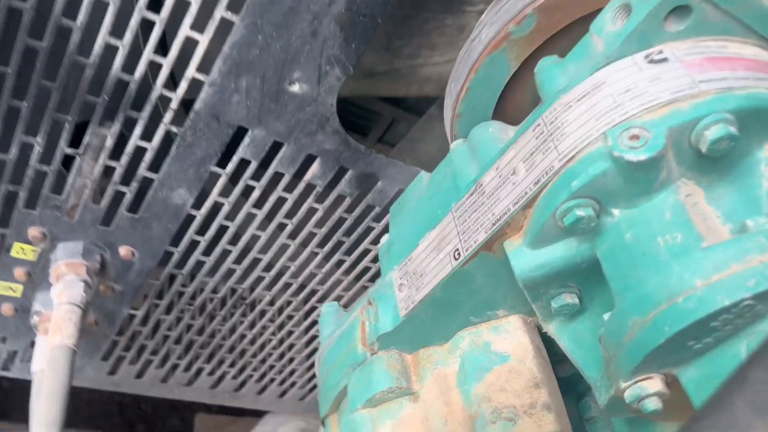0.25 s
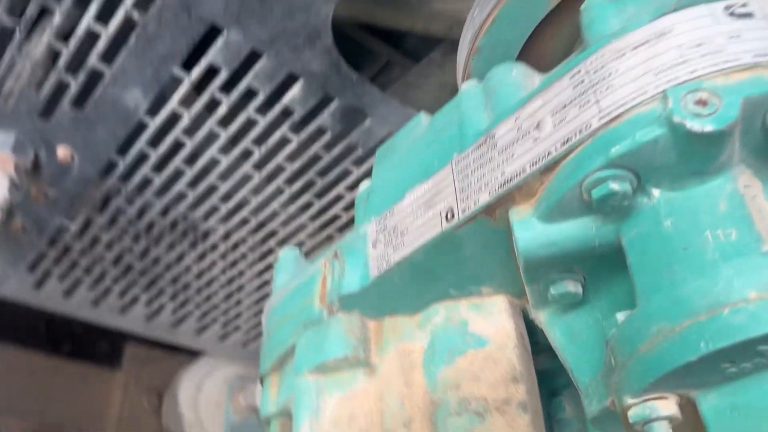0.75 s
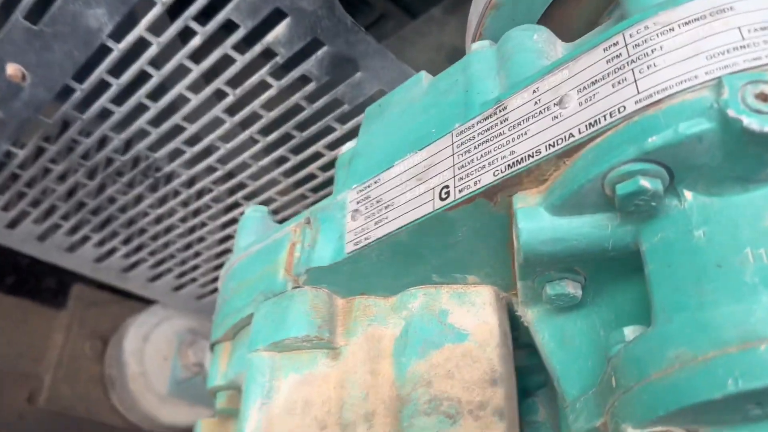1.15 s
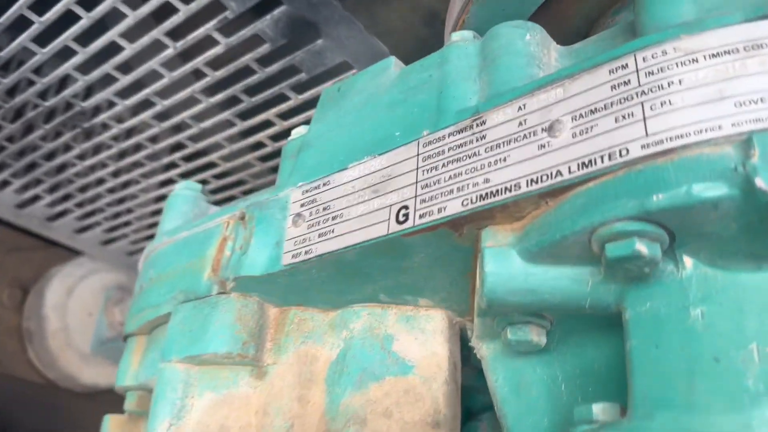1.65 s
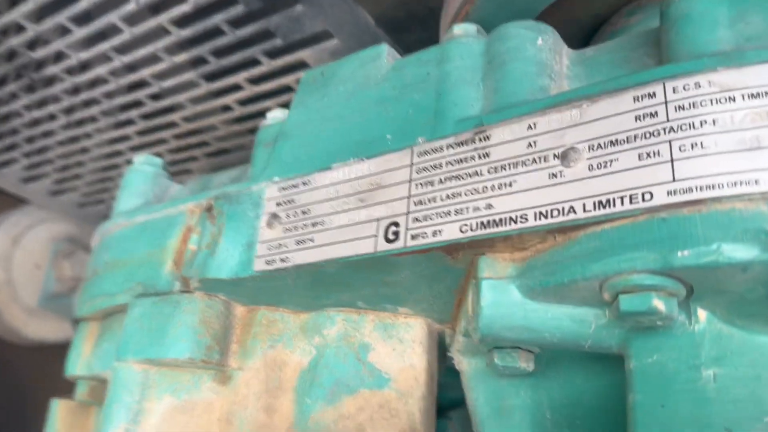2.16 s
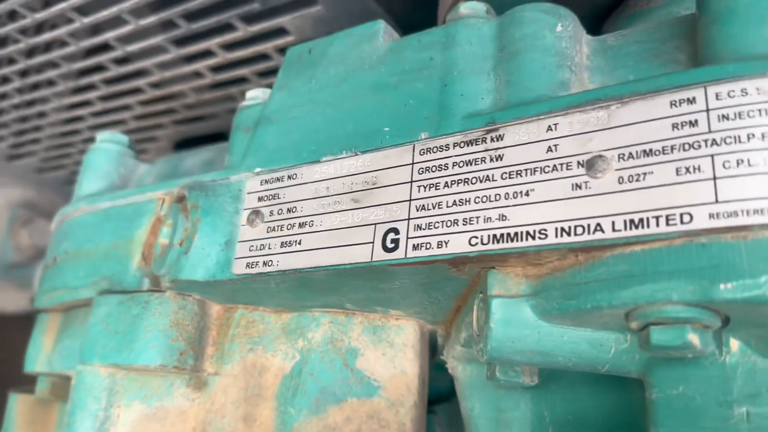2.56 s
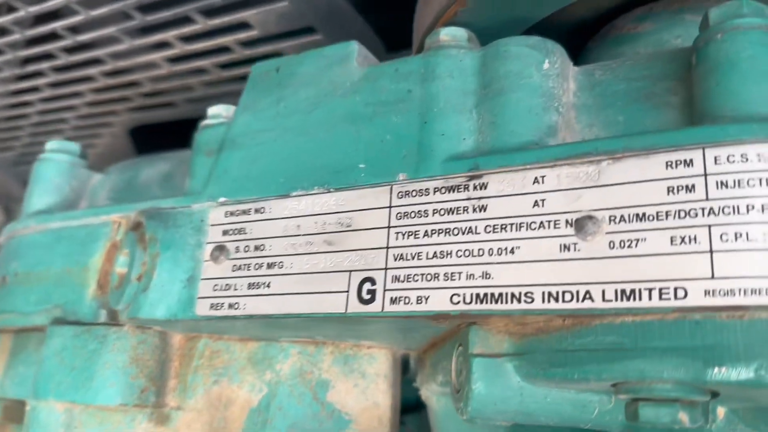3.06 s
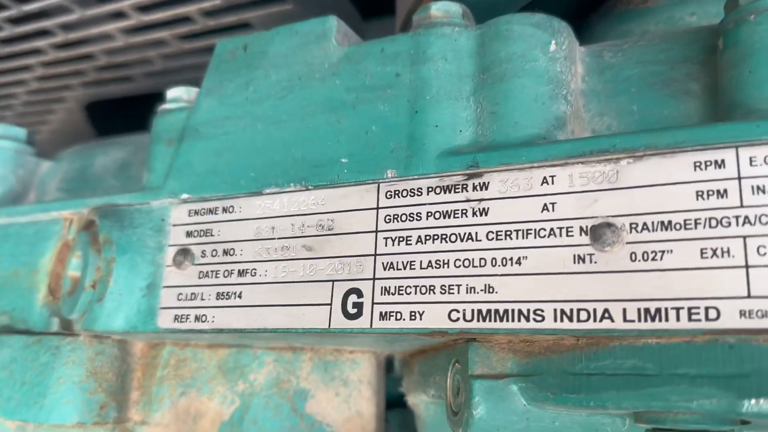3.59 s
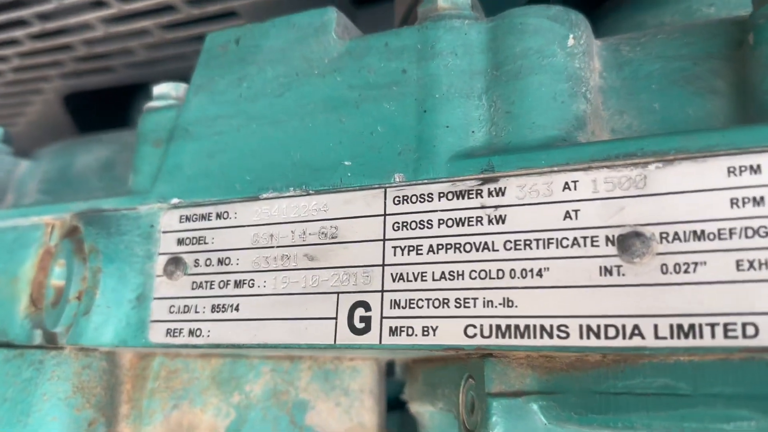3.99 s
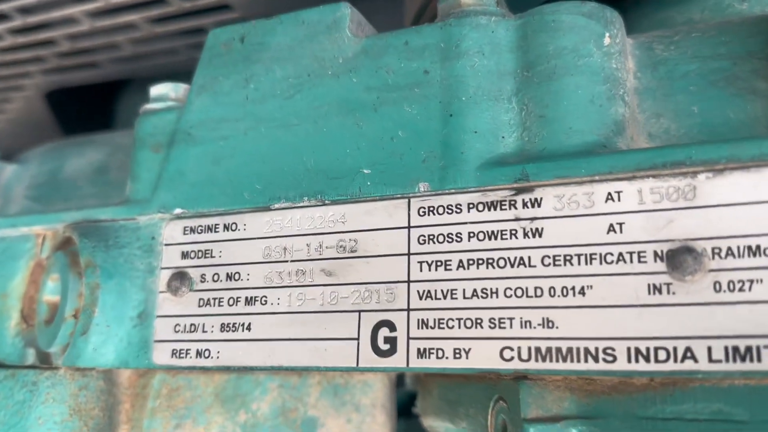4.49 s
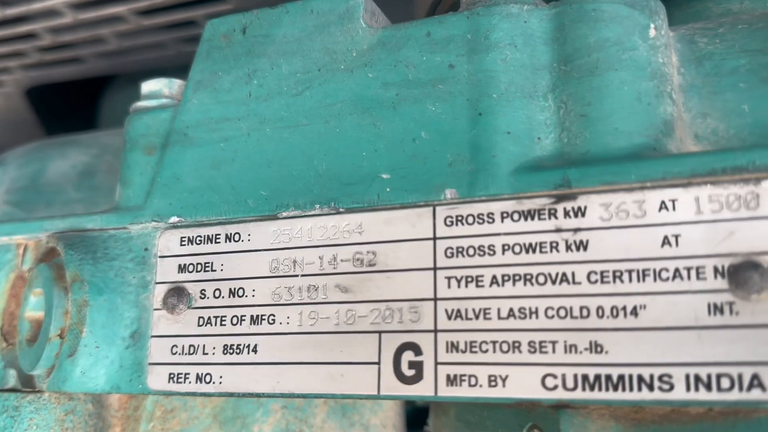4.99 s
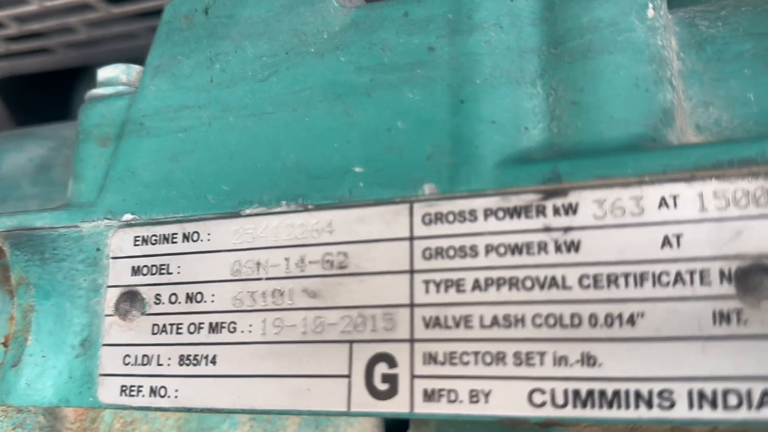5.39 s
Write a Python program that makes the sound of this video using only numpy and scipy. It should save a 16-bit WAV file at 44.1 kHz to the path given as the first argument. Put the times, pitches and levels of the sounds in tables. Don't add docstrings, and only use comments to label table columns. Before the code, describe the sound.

A constant, heavy engine drone fills the whole clip, heard by a handheld stereo microphone moving in towards an engine block. Broad rumble and hiss with open echoes surround it, and thin hums grow slightly with the approach. A faint falling turbine whine opens, quiet chirps and dry handling slips pass in the first half, a tick comes near 3.7 seconds, and a soft ringing whine rises near the end.

```python
import sys
import numpy as np
from scipy import signal
from scipy.fft import rfft, irfft
from scipy.io import wavfile
from scipy.ndimage import uniform_filter1d

SR = 44100
rng = np.random.default_rng(int(sys.argv[2]) if len(sys.argv) > 2 else 0)


def inscribe(sig):
    pcm = np.round(np.clip(np.atleast_2d(sig).T, -1, 1) * 32767)
    wavfile.write(sys.argv[1], SR, pcm.astype(np.int16))


def undo_db(level):
    steps = np.asarray(level, float) / 20
    return 10 ** steps


N = 248724
T = np.arange(N) / SR
CYCLE_HZ = 15.002
SLOW_STEP = 256

# (time [s], distance moved closer [m])
APPROACH = [(0, 0), (.94, -.1), (1.88, .1), (2.82, .15), (3.76, .17), (4.7, 0.33), (5.64, .24)]


def rms_one(x):
    return x / np.sqrt(np.mean(x ** 2) + 1e-20)


def at_hz(points, hz):
    table_hz, value = np.transpose(points)
    return np.interp(np.log(hz), np.log(np.maximum(table_hz, 1)), value)


def distance_closer():
    time_s, closer_m = np.transpose(APPROACH)
    return np.interp(T, time_s, closer_m)


def drift(rate_hz):
    pole = np.exp(-2 * np.pi * rate_hz * SLOW_STEP / SR)
    noise = rng.standard_normal(N // SLOW_STEP + 802)
    slow = signal.lfilter([1], [1, -2 * pole, pole * pole], noise)[800:]
    return rms_one(slow - slow.mean())


def every_sample(slow):
    return np.interp(np.arange(N) / SLOW_STEP, np.arange(len(slow)), slow)


def leaning(x, lean_db):
    return x * undo_db(np.array([[lean_db / 2], [-lean_db / 2]]))


def swells(rows, edge_s=0.089):
    lift_db = np.zeros(N)
    for start, end, db in rows:
        lift_db += db / 2 * (np.tanh((T - start) / edge_s) - np.tanh((T - end) / edge_s))
    return lift_db


def reflections(shape, bins, frames):
    field = rng.standard_normal(shape) + 1j * rng.standard_normal(shape)
    for size, axis in ((bins, -2), (bins, -2), (frames, -1), (frames, -1)):
        field = uniform_filter1d(field, max(int(size), 1), axis=axis)
    return field / np.sqrt(np.mean(np.abs(field) ** 2))


def standing(hz, level_db, db_per_m, echo, crest_m):
    sound_m_per_s = 343
    closer = distance_closer()
    turn = 4 * np.pi * hz * (closer - crest_m) / sound_m_per_s
    echo = np.clip(echo, 0, .9)
    return level_db + db_per_m * closer + 10 * np.log10(1 + echo ** 2 + 2 * echo * np.cos(turn))


def tone(hz, level_db, wander_db, waver, pulse_s):
    apart = every_sample(np.clip(hz / 700, 0, 1) ** 1.5 * drift(.4))
    scatter = rng.random() * (hz > 160)
    phase = 2 * np.pi * (hz * (T - pulse_s) + scatter) + every_sample(waver * drift(0.75))
    height = np.sqrt(2) * undo_db(level_db) * every_sample(undo_db(wander_db * drift(0.34)))
    side = .5 * apart * np.sin(phase) + 0.18 * apart[::-1] * np.cos(phase)
    return height * (np.cos(phase) + side * [[1], [-1]]) / np.sqrt(1 + apart ** 2 / 4)


def noisy_band(hz, level_db, width_hz, lean_db, steady=0):
    hold = 16
    phase = 2 * np.pi * np.cumsum(hz) / SR
    lowpass = signal.butter(2, width_hz / 2, fs=SR / hold, output="sos")
    rough = signal.sosfilt(lowpass, rng.standard_normal((4, N // hold + 2)))
    rough = np.repeat(rms_one(rough), hold, axis=1)[:, :N]
    rough = uniform_filter1d(rough, size=hold)
    wave = (steady + rough[:2]) * np.sin(phase) + rough[2:] * np.cos(phase)
    return leaning(undo_db(level_db) * wave, lean_db)


def birds():
    rough, echo_db, trail_s = 1.1, -1, .04
    trill_hz, trill_depth_hz = 90, 130
    # (start [s], length [s], first frequency [Hz], last frequency [Hz], level [dB])
    chirps = [
        (0.716, 0.053, 4800, 4400, -61.5),
        (0.772, 0.04, 4000, 3120, -56),
        (0.79, 0.061, 3190, 2820, -60),
        (1.096, 0.051, 4340, 3040, -67),
        (1.93, .04, 6200, 5900, -72.5),
        (2.165, 0.09, 6260, 4840, -64.5),
        (4.557, .07, 4670, 3240, -61),
        (4.933, 0.06, 5880, 5030, -70),
    ]
    out = np.zeros(N)
    lowpass = signal.butter(2, 300, fs=SR, output="sos")
    hoarse = 1 + rough * rms_one(signal.sosfilt(lowpass, rng.standard_normal(N)))
    for start, length, first_hz, last_hz, db in chirps:
        u = np.linspace(0, 1, int(length * SR))
        trill = trill_depth_hz * np.sin(2 * np.pi * trill_hz * length * u)
        hz = last_hz + (first_hz - last_hz) * (1 - u) ** 1.7 + trill
        at = int(start * SR)
        out[at:at + len(u)] += undo_db(db) * np.sin(np.pi * u) * np.sin(2 * np.pi * np.cumsum(hz) / SR)
    trail = rng.standard_normal((2, 6000)) * np.exp(-np.arange(6000) / SR / trail_s)
    trail = trail / np.sqrt(np.sum(trail ** 2, axis=1, keepdims=True))
    out = hoarse * out
    return out + undo_db(echo_db) * signal.fftconvolve(out[None], trail, axes=1)[:, :N]


def rustles():
    own = 0.23
    rise_share = 0.34
    # (peak time [s], fall time [s], lowest frequency [Hz], highest frequency [Hz], level [dB])
    slips = [
        (1.73, 0.017, 7000, 10100, -74),
        (1.92, .015, 7000, 9500, -80.5),
        (2.255, 0.02, 5500, 15500, -63.5),
        (2.272, .012, 7700, 8050, -64),
        (2.402, 0.027, 3000, 15940, -53.5),
        (2.45, 0.019, 6000, 10260, -75),
        (3.696, .004, 6000, 7500, -56),
        (1.33, .006, 2600, 4400, -60),
        (3.705, .015, 5800, 7500, -69),
    ]
    # (frequency [Hz], density [dB per Hz])
    friction_colour = [(2000, 4.5), (7000, -0.5), (10000, -7), (10800, -44), (12000, -27.5), (13000, -20),
                       (15500, -15.5), (16200, -48)]
    hz = np.maximum(np.arange(N // 2 + 1) * SR / N, 1)
    noise = rng.standard_normal(N) + own * rng.standard_normal((2, N))
    noise = irfft(rfft(noise) * undo_db(at_hz(friction_colour, hz)), N)
    out = np.zeros((2, N))
    grain = every_sample(undo_db(1.4 * drift(60.)))
    for at, fall, low_hz, high_hz, db in slips:
        near = slice(int(at * SR) - 4000, int(at * SR) + 9000)
        late = T[near] - at
        rise_shape = np.exp(-(late / (rise_share * fall)) ** 2)
        shape = np.where(late < 0, rise_shape, np.exp(-np.abs(late) / fall))
        bandpass = signal.butter(3, [low_hz, high_hz], "band", fs=SR, output="sos")
        band = rms_one(signal.sosfilt(bandpass, noise[:, near]))
        out[:, near] += undo_db(db) * grain[near] * shape * band
    return out


def body():
    # (start [s], end [s], lift [dB])
    panel_swells = [
        (1.5, 2.9, 3),
        (2.0, 2.9, 3.5),
        (2.95, 3.5, -12),
        (4.2, 5.5, 3.5),
    ]
    belt_swells = [
        (-.3, 1.15, 9.4),
        (3.95, 5.9, 10.3),
    ]
    fan_swells = [
        (1.0, 2.7, 7.7),
        (4.65, 5.55, 16.4),
    ]
    panel_hz = 2953 - 297 * distance_closer()
    panel = noisy_band(panel_hz, -64.5 + swells(panel_swells), width_hz=160.0, lean_db=-3.5)
    belt = noisy_band(215.1 + 0 * T, -61.5 + swells(belt_swells), width_hz=7.0, lean_db=-3.0, steady=2.9)
    fan_hz = 4300 + 490 * np.maximum(T - 4.3, 0)
    fan = noisy_band(fan_hz, -82 + swells(fan_swells), width_hz=190.0, lean_db=-4.0)
    return panel + belt.mean(0) + fan


def turbo():
    start_hz, end_hz, rundown_s = 6460, 5300, 0.9
    fade_db_per_s, gone_s = 3, 4.9
    # (start [s], end [s], lift [dB])
    turbo_swells = [
        (.3, .75, 7),
        (3.0, 4.7, 8.5),
        (4.9, 5.4, 8),
    ]
    hz = end_hz + (start_hz - end_hz) * np.exp(-T / rundown_s)
    level_db = -75 - fade_db_per_s * T - 40 * np.maximum(T - gone_s, 0)
    rundown = noisy_band(hz, level_db, width_hz=60.0, lean_db=12.5)
    return rundown + noisy_band(6090 + 0 * T, -81 + swells(turbo_swells), width_hz=110.0, lean_db=6.0)


def roar():
    roar_db, echo, diffuse, flicker_db, clatter_db = -32.5, 0.3, 0.66, 4.5, 1.8
    # (frequency [Hz], density [dB per Hz])
    rumble = [(18, -21.5), (25, -16.5), (33, -9.5), (50, -3.3), (68, 10.5), (82, -3), (100, 3.5),
              (115, -2.5), (142, 7.5), (168, -8), (215, -5.5), (300, -8), (350, -14), (420, -14)]
    hiss = [(420, -13.4), (650, -18.5), (780, -19), (1000, -19), (1500, -22.5), (1900, -28.5),
            (3500, -36.5), (4400, -40.5), (5300, -47.5), (6600, -48), (7600, -57.5), (8800, -62.5),
            (9800, -69), (10300, -95.5)]
    air = [(10300, -92), (12000, -89.5), (12800, -76.5), (14300, -76), (15300, -86)]
    # (frequency [Hz], left-right likeness [0-1])
    likeness = [(25, 1), (60, 1), (130, 0.96), (290, 0.54), (640, 0.46), (1400, 0.2), (3080, 0.23),
                (6770, 0.26), (14900, 0.28)]
    # (frequency [Hz], left minus right [dB])
    lean = [(60, -1), (110, -0.5), (200, 0), (380, -1), (700, 5.5), (1280, -3.5), (2000, -5.5),
            (4370, -0.5), (8060, 2), (14900, -2.5)]
    # (frequency [Hz]), (lift [dB]), (gain per metre closer [dB/m])
    bands_hz = [130, 280, 1200, 5000]
    band_lift_db = [0.88, -0.35, -0.63, 2]
    band_db_per_m = [0.5, 6, 7.1, 3]

    hz, time_s, (source, left, right) = signal.stft(rng.standard_normal((3, N)), SR, nperseg=4096)
    hz = np.maximum(hz, 1)[:, None]
    unlike = np.sqrt(1 - np.clip(at_hz(likeness, hz), 0, 1))
    shared = reflections(source.shape, bins=6.2, frames=6.4)
    own = reflections((2,) + source.shape, bins=8, frames=11)
    own = own / (np.abs(own) + 0.29) ** 0.4
    paths = 1 + echo * np.clip(hz / 1500, 0, 1) * shared
    ears = np.sqrt(1 - unlike ** 2) + unlike * np.sqrt(1 - diffuse ** 2) * own
    pair = paths * (ears * source + unlike * diffuse * np.array([left, right]))

    closer = np.interp(time_s, *np.transpose(APPROACH))
    log_bands = np.log(bands_hz)
    lift_db = np.interp(np.log(hz), log_bands, band_lift_db)
    lift_db = lift_db + closer * np.interp(np.log(hz), log_bands, band_db_per_m)
    gusts = rng.standard_normal(len(time_s))
    lift_db = lift_db + flicker_db * np.interp(hz, [7000, 12000], [0, 1]) * gusts
    uneven = reflections(source.shape, bins=110, frames=1.5).real
    lift_db = lift_db + clatter_db * np.clip(hz / 2500, 0, 1) * uneven
    lean_db = at_hz(lean, hz) / 2 * np.array([1, -1])[:, None, None]
    colour_db = at_hz(rumble + hiss[1:] + air[1:], hz)
    out = signal.istft(pair * undo_db(colour_db + lift_db + lean_db), SR, nperseg=4096)[1][:, :N]
    return undo_db(roar_db) * rms_one(out)


def hums():
    # (multiple of the cycle rate), (left minus right [dB])
    hum_order = [30, 40, 64, 81]
    hum_lean_db = [4, -7, -3, -2.5]
    # (level [dB], gain per metre closer [dB/m], echo share [0-1], place of a crest [m])
    hum_field = [(-46, 10, 0.23, .125), (-63.5, 26.5, .23, 0.18), (-60, 25.5, .07, 0.018),
                 (-63.5, 6.5, 0.7, .102)]
    # (frequency [Hz], level [dB])
    high_tones = [(9512, -89.5), (9690, -92)]
    out = np.zeros((2, N))
    for order, field, lean_db in zip(hum_order, hum_field, hum_lean_db):
        hz = order * CYCLE_HZ
        hum = tone(hz, standing(hz, *field), wander_db=-0.2, waver=0.21, pulse_s=0)
        out += leaning(hum, lean_db)
    for hz, db in high_tones:
        out += tone(hz, db, wander_db=1.0, waver=.3, pulse_s=0)
    return out


def second_machine():
    cycle_hz, first_pulse_s = 14.8, .0065
    # (multiple of its cycle rate), (level [dB])
    second_order = [3, 4, 6, 10]
    second_db = [-61.5, -43, -41.5, -46]
    wavers = (0.71, 0.19, 2.43, 0.42)
    return sum(tone(k * cycle_hz, db, wander_db=2.0, waver=waver, pulse_s=first_pulse_s)
               for k, db, waver in zip(second_order, second_db, wavers))


def exhaust():
    turn_s, uneven_cylinder_s = .0004, .0191
    # (multiple of the cycle rate), (level [dB])
    exhaust_order = [2, 3, 4, 5, 6, 8, 9, 10, 12, 13, 16, 17, 18, 19, 20, 24, 28, 37, 43, 45, 57, 75, 96,
                     120, 143, 192]
    exhaust_db = [-61, -46, -42, -42, -22.5, -50, -39.5, -43, -51.5, -56.5, -54, -51.5, -63, -56, -56,
                  -68.5, -65.5, -68.5, -63, -65, -65.5, -70, -70, -80, -72.5, -77.5]
    out = np.zeros((2, N))
    for k, db in zip(exhaust_order, exhaust_db):
        firing = k == 6
        out += tone(k * CYCLE_HZ, db, wander_db=.3 if firing else 1.3, waver=.04 if firing else .15,
                    pulse_s=uneven_cylinder_s if k % 2 else turn_s)
    return out


def scene():
    background = birds() + rustles()
    whines = body() + turbo()
    return background + whines + roar() + hums() + second_machine() + exhaust()


def top_cut(x):
    return signal.sosfilt(signal.butter(12, 15480, fs=SR, output="sos"), x)


def record(dry):
    return top_cut(dry)


dry = scene()
out = record(dry)
inscribe(out)
```